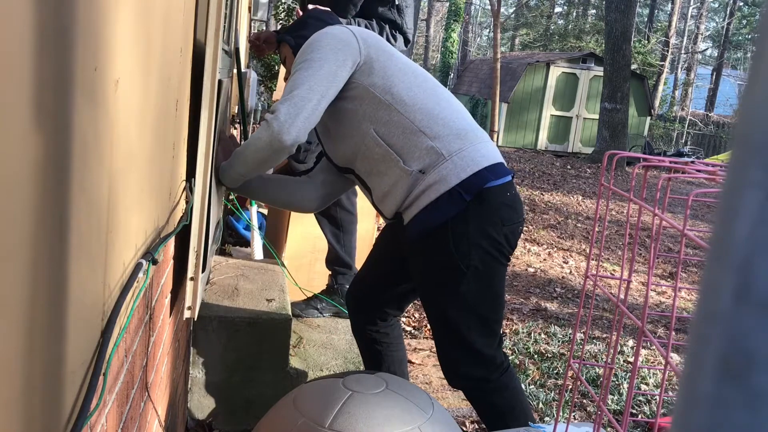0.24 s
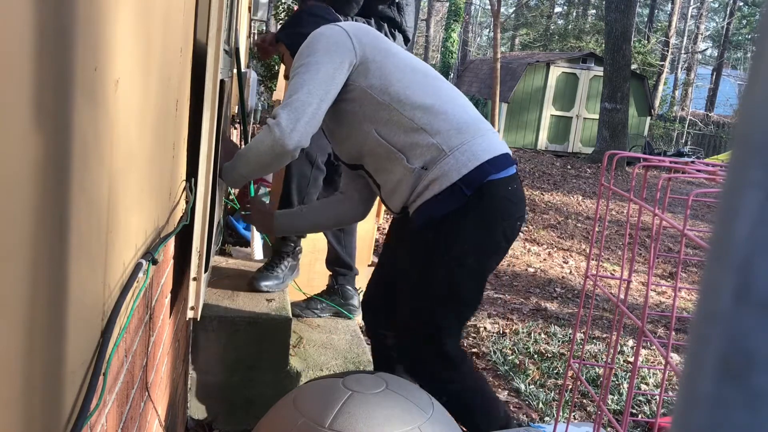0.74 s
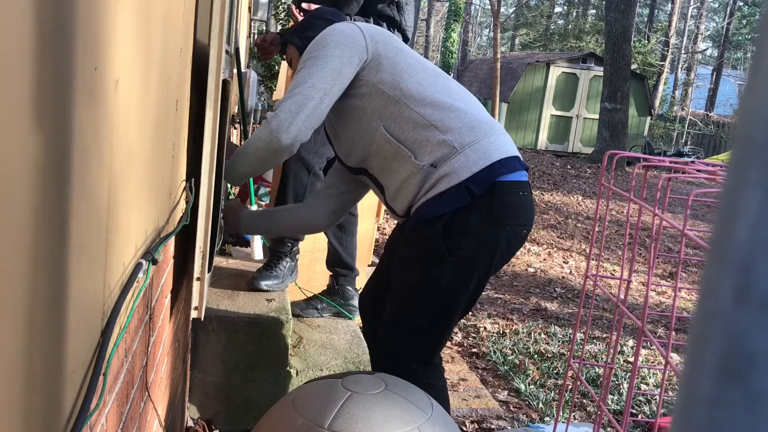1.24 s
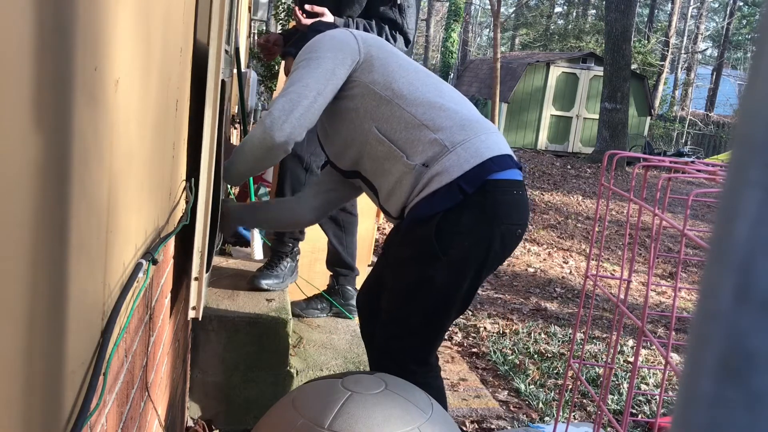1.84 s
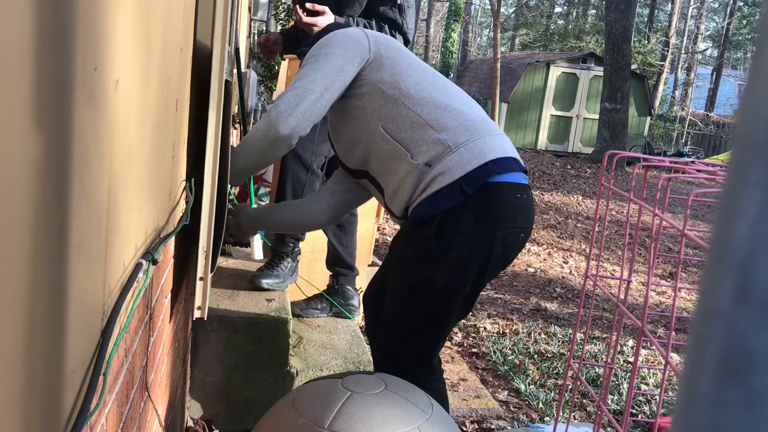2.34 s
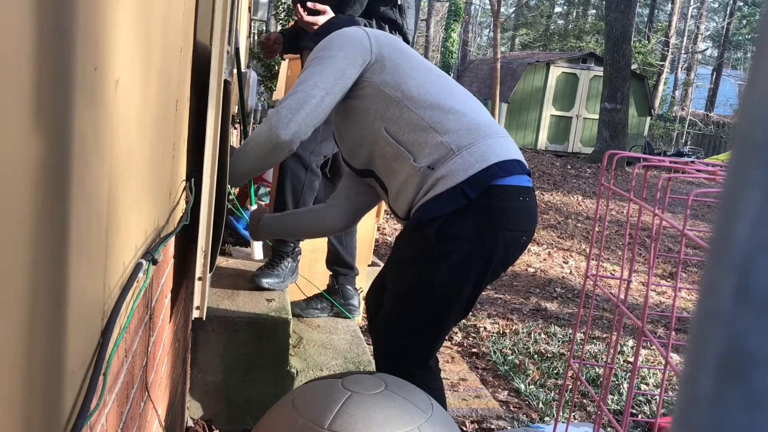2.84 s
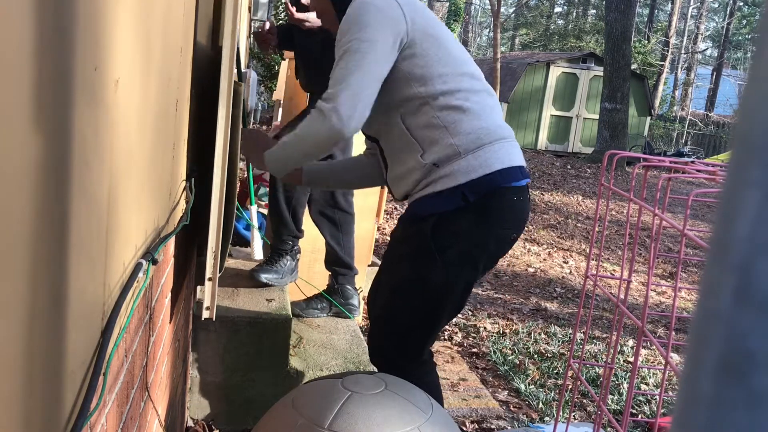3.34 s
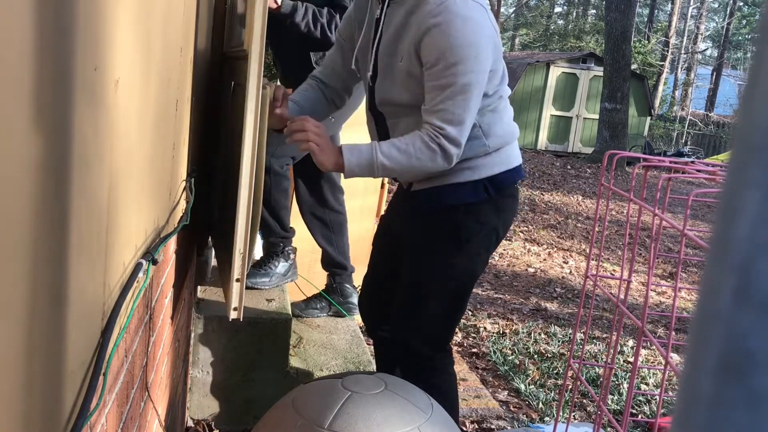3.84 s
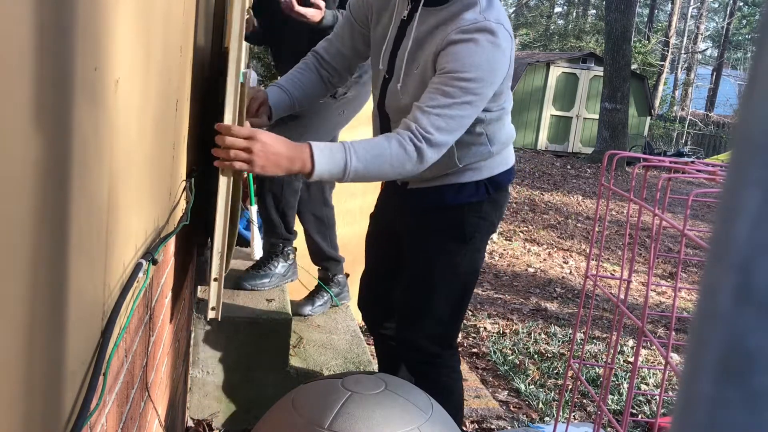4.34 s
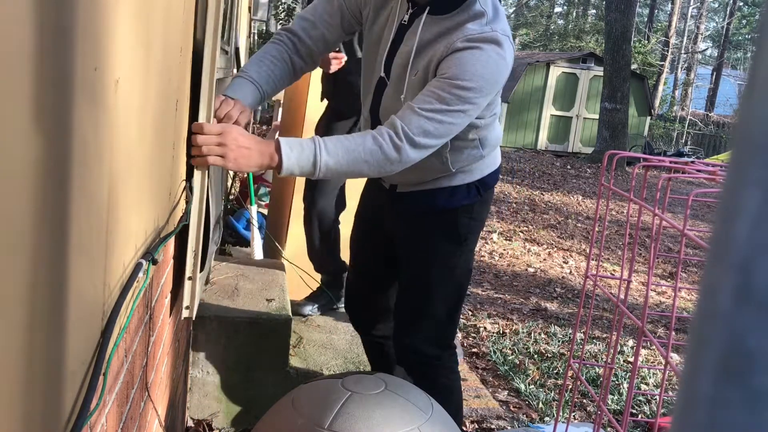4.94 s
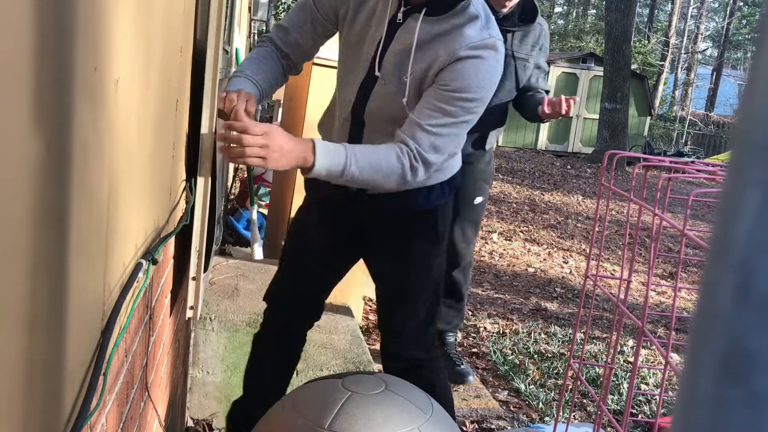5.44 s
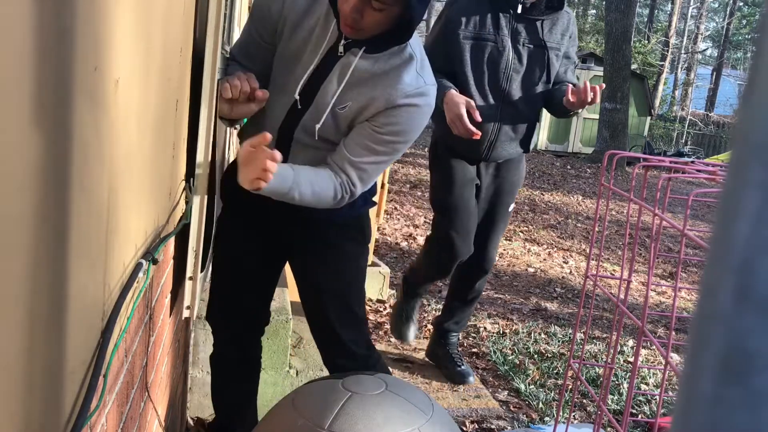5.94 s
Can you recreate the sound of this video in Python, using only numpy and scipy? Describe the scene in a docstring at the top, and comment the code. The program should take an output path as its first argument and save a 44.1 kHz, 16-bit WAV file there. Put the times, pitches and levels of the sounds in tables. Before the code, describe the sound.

Someone bangs hard on a loose, rattling house door outdoors: quick blows, a pause with scraping and clacks, then two more thumps.

```python
"""Outdoors in a quiet yard, a few metres from a loose house door: someone bangs on it hard.
A run of blows, a pause, two more. Each blow is a cluster of contacts that excites noise bands and panel modes.
The fittings tick and rattle as short noise bursts; clacks, thuds and pings are clusters of decaying sines.
In between, hands scrape on the door and feet shuffle in dry leaves, made of swelling streams of tiny snaps."""
import sys
import numpy as np
from scipy import signal
from scipy.fft import rfft, irfft
from scipy.io import wavfile
from scipy.ndimage import uniform_filter1d

SR = 44100
rng = np.random.default_rng(int(sys.argv[2]) if len(sys.argv) > 2 else 0)


def inscribe(sig):
    """Save sig as 16-bit PCM at rate SR to the path in sys.argv[1].

    A 1-D sig is mono; a 2-D sig holds one channel per row.
    Samples are clipped to [-1, 1] before scaling.
    """
    pcm = np.round(np.clip(np.atleast_2d(sig).T, -1, 1) * 32767)
    wavfile.write(sys.argv[1], SR, pcm.astype(np.int16))


N = 273420
TIME_S = np.arange(N) / SR
FREQS_HZ = np.fft.rfftfreq(N, 1 / SR)
BAND_HZ = np.geomspace(35, 16000, 22)


def amp(db):
    """Decibels to gain."""
    return 10 ** (np.asarray(db) / 20)


def unit(x):
    """Scales to rms 1."""
    return x / np.sqrt(np.mean(x ** 2) + 1e-20)


def read(points, hz, axis=1):
    """Interpolates one column of a table along log frequency."""
    table = np.array(points, float)
    return np.interp(np.log(hz + 1), np.log(table[:, 0] + 1), table[:, axis])


def add(mix, start_s, sound):
    """Mixes a sound in at start_s, trimmed to the mix."""
    start = round(start_s * SR)
    sound = sound[max(-start, 0):]
    part = mix[max(start, 0):][:len(sound)]
    part += sound[:len(part)]


def colour(x, points):
    """Gives x a spectrum, at rms 1."""
    return unit(irfft(rfft(x) * amp(read(points, FREQS_HZ)), N))


def wander(count):
    """Smooth chance of rms 1 that changes over count samples."""
    once = uniform_filter1d(rng.standard_normal(N), count)
    return unit(uniform_filter1d(once, count))


def noise_bands(ripple_db=2.5, grain_db=0.7, ripple_bins=600):
    """Grainy noise cut into bands: crowded modes too close to tell apart, some stronger than others."""
    white = rfft(rng.standard_normal(N) * amp(grain_db * wander(count=50)))
    white = white * unit(amp(ripple_db * wander(count=ripple_bins)[:len(white)]))
    band = np.round(np.interp(np.log(FREQS_HZ + 1), np.log(BAND_HZ), np.arange(len(BAND_HZ))))
    return [irfft(white * (band == k) * (FREQS_HZ > 28), N) for k in range(len(BAND_HZ))]


def fade(energy, t60_s):
    """Stored energy leaks away by 60 dB in t60_s."""
    return signal.lfilter([1], [1, -np.exp(-np.log(10 ** 6) / (t60_s * SR))], energy + 1e-20)


def lag(x, lag_s):
    """Follows x with a delay, as energy spreads through a panel."""
    r = np.exp(-1 / (max(lag_s, 1e-4) * SR))
    return signal.lfilter([1 - r], [1, -r], x + 1e-20)


def struck(times_s, energy, t60_s, swell_s):
    """Energy in a band that is struck at the given times."""
    lead = SR // 4  # room for hits before time 0
    at = np.clip(np.round(times_s * SR).astype(int) + lead, 0, None)
    train = np.bincount(at, energy, N + lead)
    return lag(fade(train, t60_s), swell_s)[lead:lead + N]


def rings(table, swell_s, spread, count=4):
    """Each event rings a cluster of unevenly spaced modes."""
    out, t = np.zeros(N), np.arange(SR // 2) / SR
    for (s, db, hz, t60_s, *_), (places, turns) in zip(table, rng.random((len(table), 2, count))):
        offsets = 2 * (np.arange(count) + places) / count - 1
        cluster = sum(np.sin(2 * np.pi * (hz * (1 + spread * d) * t + turn)) for d, turn in zip(offsets, turns))
        shape = amp(-60 * t / t60_s) * (1 - np.exp(-t / swell_s))
        add(out, s, amp(db) * unit(cluster * shape) * np.sqrt(np.mean(shape ** 2)))
    return out


# yard spectrum: (frequency [Hz], relative density [dB per Hz])
YARD_SPECTRUM = [(15, -33.5), (30, -19.5), (55, -4), (85, -7), (130, -14.5), (250, -19.5), (500, -25),
                 (1000, -23.5), (1600, -41), (3000, -49), (8000, -55), (15500, -50)]


def yard(level_db=-47, swell_db=0.5):
    """Low outdoor rumble and thin hiss: coloured noise with a slowly wandering level."""
    return amp(level_db + swell_db * wander(count=5000)) * colour(rng.standard_normal(N), YARD_SPECTRUM)


def slide(start_hz=460, fall_hz_per_s=780, level_db=-43.5, length_s=0.24, waver=0.039, flicker_db=3):
    """A faint, unsteady tone that falls in pitch and fades out as the first ring dies away."""
    t = np.minimum(TIME_S, length_s)
    hz = (start_hz - fall_hz_per_s * t) * (1 + waver * wander(count=400))
    gain = amp(level_db + flicker_db * wander(count=500)) * (1 - (t / length_s) ** 4)
    return gain * np.sin(2 * np.pi * np.cumsum(hz) / SR)


def stroke(peak_s, rise_s, fall_s, drop_db=20):
    """Gain of one rubbing movement: up by drop_db in rise_s, down by drop_db in fall_s."""
    away = np.maximum((peak_s - TIME_S) / rise_s, (TIME_S - peak_s) / fall_s)
    return amp(-drop_db * np.minimum(away, 10))


# cloth spectrum: (frequency [Hz], relative density [dB per Hz])
CLOTH_SPECTRUM = [(100, -59), (6000, -15), (10000, -7.5), (13000, 2.5), (15500, 2.5)]
# cloth as the body turns: (peak time [s], rise [s], fall [s], level [dB])
CLOTH_SWISHES = [(5.32, 0.22, 0.21, -33.5), (5.7, .4, .35, -48)]


def swish(flicker_db=2.5):
    """Sleeve fibres rubbing on each other: a fine, very high fizz."""
    gain = np.sqrt(sum((amp(db) * stroke(*shape)) ** 2 for *shape, db in CLOTH_SWISHES))
    return colour(rng.standard_normal(N), CLOTH_SPECTRUM) * gain * amp(flicker_db * wander(count=150))


# body of the rubbing: (frequency [Hz], relative density [dB per Hz])
SCRAPE_SPECTRUM = [(100, -12.5), (400, -3), (900, 5.5), (1900, 4.5), (4000, -5), (6000, -12.5),
                   (9000, -28.5), (16000, -30)]
# hiss of the rubbing: (frequency [Hz], relative density [dB per Hz])
HISS_SPECTRUM = [(100, -46), (2000, -11), (5800, -1), (8000, -7), (10500, -7), (13000, -3.5), (15500, -8)]
# hand scrapes and foot shuffles: (peak time [s], rise [s], fall [s], body level [dB], hiss level [dB])
RUB_STROKES = [(.04, 0.078, 0.11, -46, -54), (.52, 0.75, .8, -48.5, -80), (.96, 0.56, 0.62, -51, -46.5),
               (1.008, 0.042, 0.098, -41.5, -32.5), (2.6, 2.7, 2.3, -60, -61.5),
               (4.08, 0.13, 0.2, -48.5, -59), (4.38, 0.78, .25, -59.5, -52.5),
               (4.53, 0.2, 0.23, -41.5, -52.5), (4.93, 0.24, 0.19, -53.5, -50),
               (5.24, 0.3, 0.83, -44.5, -40.5), (5.608, 0.17, 0.25, -32, -25.5),
               (6.2, 0.31, .2, -50, -44.5)]


def shuffle(grain_db=2.0, flicker_db=1.36):
    """Dry rubbing and leaves: strokes made of a dense stream of tiny snaps of uneven size."""
    power = np.array([stroke(*row[:3]) for row in RUB_STROKES]) ** 2
    body_gain, hiss_gain = np.sqrt(amp(np.array(RUB_STROKES)[:, 3:].T) ** 2 @ power)
    sizes = amp(grain_db * np.minimum(rng.exponential(1, N), 5))
    snaps = rng.standard_normal(N) * sizes * (rng.random(N) < .15)
    body = colour(snaps, SCRAPE_SPECTRUM) * body_gain
    hiss = colour(snaps + 0.37 * rng.standard_normal(N), HISS_SPECTRUM) * hiss_gain
    return (body + hiss) * amp(flicker_db * wander(count=300))


# faint rubbing as the door slides: (time [s], level [dB], frequency [Hz])
SQUEAL_TRACK = [(.35, -80, 1810), (.45, -66, 1810), (0.649, -54, 1880), (.83, -50, 1795), (.94, -51, 1744),
                (1.0, -81, 1710)]


def squeal(count=55):
    """A narrow, unsteady band of friction noise."""
    s, db, hz = np.transpose(SQUEAL_TRACK)
    turn = 2 * np.pi * np.cumsum(np.interp(TIME_S, s, hz)) / SR
    band = wander(count=count) * np.cos(turn) + wander(count=count) * np.sin(turn)
    return np.interp(TIME_S, s, amp(db), 0, 0) * band


# body weight: (time [s], level [dB], centre frequency [Hz], t60 [s])
BODY_THUDS = [(.988, -21.5, 83.7, 0.26), (5.04, -31.5, 62.4, 0.2), (5.895, -16, 54.8, 0.32)]


def thuds():
    """Dull thuds of body weight: a few close low modes, softly swelling."""
    return rings(BODY_THUDS, swell_s=0.012, spread=0.062)


# metal fittings: (time [s], level [dB], centre frequency [Hz], t60 [s])
METAL_PINGS = [(2.996, -35.5, 9270, 0.073), (4.672, -54.5, 9250, 0.11)]


def pings():
    """Thin pings of the metal fittings: close high modes beating."""
    return rings(METAL_PINGS, swell_s=0.0012, spread=0.0304, count=8)


# door shifted in its frame: (time [s], ring level [dB], centre frequency [Hz], t60 [s],
# relative click level [dB], relative high part of the click [dB])
FRAME_CLACKS = [(.194, -38, 1255, 0.054, -39.5, -19), (0.981, -37, 1315, .055, -26.5, -18),
                (4.009, -38.5, 1695, 0.36, -25, -20), (4.066, -38.5, 898, 0.16, -31, -38),
                (4.258, -44.5, 1110, .16, -38, -37), (4.432, -41.5, 558, 0.13, -33, -41),
                (4.475, -38.5, 860, 0.078, -35, -27), (4.526, -28, 2090, 0.14, -23.5, -13.5),
                (4.596, -37.5, 1900, 0.12, -31.5, -35), (4.894, -36, 2060, 0.11, -29.5, -24),
                (5.152, -26.5, 1728, 0.088, -30, -15), (5.24, -39.5, 256, 0.2, -45, -20),
                (6.068, -34, 1860, .07, -30, -25), (6.143, -35, 363, 0.24, -20, -7.5)]


def clacks():
    """Hollow ring of the door shifting in its frame: many widely spread modes."""
    return rings(FRAME_CLACKS, swell_s=0.00055, spread=0.49, count=18)


# loose fittings: (time [s], relative peak level [dB], relative high part [dB])
FITTING_RATTLES = [(1.392, -34.5, -22), (1.505, -41.5, -26), (1.765, -41, 0), (1.795, -30, -5.5),
                   (2.21, -39, -15), (2.36, -22.5, -1), (2.8859, -25, -1), (3.0942, -24.5, -2.5),
                   (3.1964, -23, -22), (4.04, -29.5, -8), (4.784, -34.5, -22), (5.916, -23, -2)]
LATCH_DELAY_S, LATCH_HIGH_DB = .105, -10
FITTING_LOW_DB, CLACK_LOW_DB = -12, -0.5  # small metal parts have little bass
SLIP_START_S, SLIPS_PER_S, SLIP_SLOWING_PER_S = 3.319, 15.2, 2.25  # slowing: drop in rate per slip
SLIP_DB, SLIP_LOW_DB, SLIP_HIGH_DB = -45, 1.5, -14.5


def small_contacts(count=6):
    """Latch drops, fittings, clacks, slowing stick-slip as the door eases open: (s, peak, low, high dB)."""
    rows = [(s + LATCH_DELAY_S, db, FITTING_LOW_DB, LATCH_HIGH_DB) for s, *_, db in DOOR_BLOWS]
    rows += [(s, db, FITTING_LOW_DB, high_db) for s, db, high_db in FITTING_RATTLES]
    rows += [(s, db, CLACK_LOW_DB, high_db) for s, *_, db, high_db in FRAME_CLACKS]
    gaps_s = 1 / np.maximum(SLIPS_PER_S - SLIP_SLOWING_PER_S * np.arange(count - 1), 2)
    slips_s = SLIP_START_S + np.r_[0, np.cumsum(gaps_s)]
    rows += [(s, SLIP_DB, SLIP_LOW_DB, SLIP_HIGH_DB) for s in slips_s]
    return np.array(rows)


RATTLE_DB, RATTLE_LOW_DB, RATTLE_HIGH_DB = -5.5, 10.5, 6.5
RATTLE_T60_AT_2500_HZ_S = .13


def rattles(bands):
    """Small contacts of latch and frame: short noise bursts, each brighter or duller by where it lands."""
    s, db, low_db, high_db = small_contacts().T
    out = np.zeros(N)
    for hz, noise in zip(BAND_HZ, bands):
        low, high = read([(1200, 1), (2400, 0)], hz), read([(6000, 0.013), (9500, 0.92)], hz)
        level_db = db + low * (low_db + RATTLE_LOW_DB) + high * (high_db + RATTLE_HIGH_DB)
        level_db = level_db + read([(60, -10.5), (300, -3.5), (1200, -2), (2300, 4.5), (4000, -1.5),
                                    (7000, 2), (15000, -5.0)], hz)
        t60_s = RATTLE_T60_AT_2500_HZ_S * read([(300, 3.33), (2500, 1.0), (12000, 0.63)], hz)
        out += noise * np.sqrt(struck(s, amp(level_db) ** 2, t60_s, swell_s=0.001))
    return amp(RATTLE_DB) * out


def favour(hz, spot_hz, boost_db, octaves=0.33):
    """The spot struck feeds the modes around one frequency best (dB)."""
    return boost_db * np.exp(-.5 * (np.log2(hz / spot_hz) / octaves) ** 2)


# blows, some in two or three goes: (time [s], relative strength [dB], bass [dB], treble [dB],
# clatter length [s], frequency favoured by the spot [Hz], its boost [dB], relative latch level [dB])
DOOR_BLOWS = [(-.09, -7.5, 6, -2, 0.022, 318, 6.5, -62), (.274, -11, 1.5, -7, 0.0052, 2500, -1.5, -57),
              (.284, 2, -7.5, -3, 0.018, 2300, 0.5, -57), (.305, -3, -8.5, -16, 0.02, 1090, 7, -56),
              (1.226, -8.5, 4.5, -4.5, 0.032, 875, 2.5, -29), (1.604, -0.5, 0.5, -4, 0.03, 2600, 2, -21.5),
              (1.940, 2, -1, -3.5, 0.0036, 2300, 0.5, -27.5),
              (2.294, 1, -2.5, -5.5, 0.022, 400, 2.5, -23.5), (2.669, 0, .5, -2, 0.029, 1896, 1, -25),
              (4.984, -11, -3.5, -1, 0.0055, 2330, 1.5, -60), (4.995, -22, 10.5, -20, 0.0049, 190, 7, -60),
              (5.853, -1, 4, -1.5, .02, 1500, 3.5, -17.5), (5.878, -8.5, 0, 1.5, 0.0044, 403, 6.5, -42.5)]
# panel modes: (nominal frequency [Hz], relative level [dB], t60 [s])
PANEL_MODES = [(50, -10, 0.39), (114, -9.5, 0.31), (179, -4.5, 0.31), (256, -2.5, 0.31), (323.5, 0.5, 0.26),
               (373.7, -4, 0.34), (505, -6.5, 0.35), (632.4, 1.5, 0.31), (848, -1.5, 0.25), (1035, 1, 0.28),
               (1180, -5.5, 0.13), (1257, -1, 0.067), (1500, -2.5, 0.25), (1740, -8.5, 0.11),
               (1893, -12.5, 0.14), (2230, -12.5, 0.22), (2575, 9, 0.12), (3650, -19, .16)]


def panel(level_db=-21.5, spread_db=2, swell_s=0.0017):
    """The panel's strongest modes; each blow lands on another spot and weights them anew."""
    out, t = np.zeros(N), np.arange(SR // 2) / SR
    for s, db, bass_db, _, _, spot_hz, boost_db, _ in DOOR_BLOWS:
        ring = np.zeros(len(t))
        chances = rng.uniform(-0.93, 1, (len(PANEL_MODES), 3))
        for (hz, mode_db, t60_s), (size, detune, turn) in zip(PANEL_MODES, chances):
            peak_db = mode_db + spread_db * size + bass_db * (hz < 450) + favour(hz, spot_hz, boost_db)
            tone = np.sin(2 * np.pi * hz * (1 + .025 * detune) * t + np.pi * turn)
            ring += amp(peak_db - 60 * t / t60_s) * tone
        add(out, s, amp(db + level_db) * ring * (1 - np.exp(-t / swell_s)))
    return out


TOUCH_LEAD_S, TOUCH_DB = 0.0031, -15  # hand meets the loose door before the door meets its frame
REBOUND_DELAY_S, REBOUND_DB, REBOUND_TREBLE_DB = 0.025, -11, -23  # door swings back, lands dully
CLATTER_SHARE = 0.56  # of the energy


def contacts(count=7, first_snap_db=3):
    """Touch, main contact, frame chatter, rebound: (s, energy, bass dB, treble dB, spot Hz, boost dB)."""
    rows = []
    chances = rng.random((len(DOOR_BLOWS), 2, count))
    for (s, db, bass_db, treble_db, length_s, *spot, _), (jitter, luck) in zip(DOOR_BLOWS, chances):
        energy = amp(db) ** 2
        rows.append((s - TOUCH_LEAD_S, amp(db + TOUCH_DB) ** 2, bass_db, treble_db, *spot))
        rows.append((s, (1 - CLATTER_SHARE) * energy, bass_db, treble_db + first_snap_db, *spot))
        rebound_energy = amp(db + REBOUND_DB) ** 2
        rows.append((s + REBOUND_DELAY_S, rebound_energy, bass_db, treble_db + REBOUND_TREBLE_DB, *spot))
        chatter_s = s + length_s * (np.arange(count) + .5 + jitter) / count
        sizes = (.3 + luck) ** 2
        for at_s, part in zip(chatter_s, CLATTER_SHARE * sizes / sizes.sum()):
            rows.append((at_s, part * energy, bass_db, treble_db, *spot))  # duller than the main one
    return np.array(rows)


# dense ring of door and wall: (frequency [Hz], relative density [dB per Hz], t60 [s], swell [s])
DOOR_RING = [(35, -12, 0.74, .012), (70, -7.5, 0.26, .01), (187, -3, 0.34, .004), (327, -2, 0.24, 0.0042),
             (530, -7.5, 0.2, 0.0034), (649, 0, 0.16, 0.016), (995, 2, 0.18, .012),
             (1500, -5.5, 0.15, 0.0072), (2500, -2.5, 0.18, .003), (2790, -7.5, 0.15, 0.0029),
             (4200, -10, 0.15, 0.0054), (7000, -13.5, .16, .001), (10800, -21, 0.15, .001),
             (15500, -16.5, 0.12, .001)]
BANG_DB, CRACK_DB, CRACK_T60_S = 3, -9, 0.084
YARD_ECHO_DB, YARD_ECHO_T60_S = -30, 1


def bangs(bands):
    """The crash of door, frame and wall; each contact cracks, the ring swells, the yard answers faintly."""
    s, energy, bass_db, treble_db, spot_hz, boost_db = contacts().T
    out = np.zeros(N)
    for hz, noise in zip(BAND_HZ, bands):
        bass = read([(300, 0.89), (800, 0.026)], hz)
        treble = read([(1200, 0.021), (5000, 0.96)], hz)
        tone_db = bass_db * bass + treble_db * treble
        fed = energy * amp(tone_db + favour(hz, spot_hz, boost_db)) ** 2
        near = struck(s, fed, read(DOOR_RING, hz, axis=2), read(DOOR_RING, hz, axis=3))
        crack_db = CRACK_DB + read([(400, 1), (2000, 9.4), (12000, 14)], hz)
        crack = struck(s, fed, CRACK_T60_S, swell_s=0) * amp(crack_db) ** 2
        far_db = YARD_ECHO_DB + read([(200, 10.5), (1500, 9.5), (10000, -2.5)], hz)
        far = lag(near, YARD_ECHO_T60_S / np.log(10 ** 6)) * amp(far_db) ** 2
        out += noise * amp(read(DOOR_RING, hz)) * np.sqrt(near + crack + far)
    return amp(BANG_DB) * out


def scene():
    """Door, fittings, feet, clothes and yard, heard from one spot."""
    bands = noise_bands()
    door = bangs(bands) + panel() + rattles(bands)
    door += thuds() + clacks() + pings()
    return (door + squeal() + shuffle() + swish() + yard() + slide())[None]


def record(dry, ceiling=0.99, edge_hz=16050):
    """The loudest peaks are rounded off; then the band limit."""
    rounded = ceiling * np.tanh(dry / ceiling)
    lowpass = signal.firwin(511, edge_hz, window=("kaiser", 9), fs=SR)
    return signal.oaconvolve(rounded, lowpass[None], "same")


dry = scene()
out = record(dry)
inscribe(out)
```